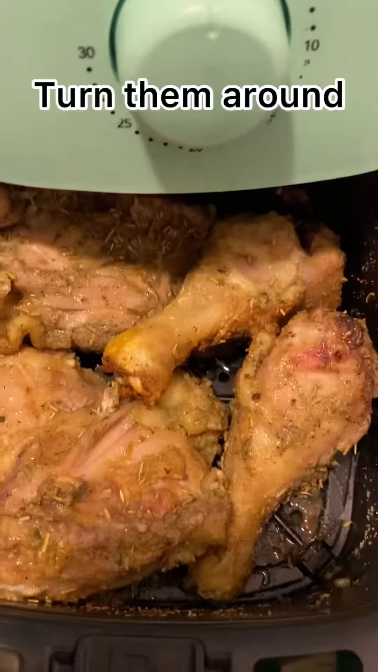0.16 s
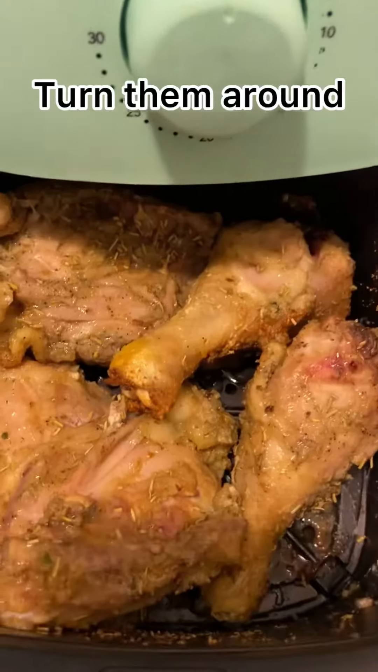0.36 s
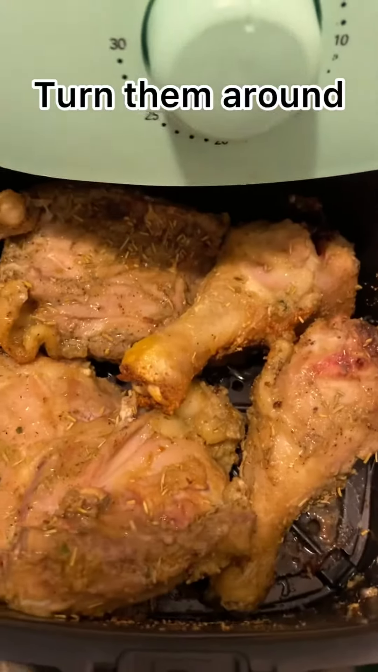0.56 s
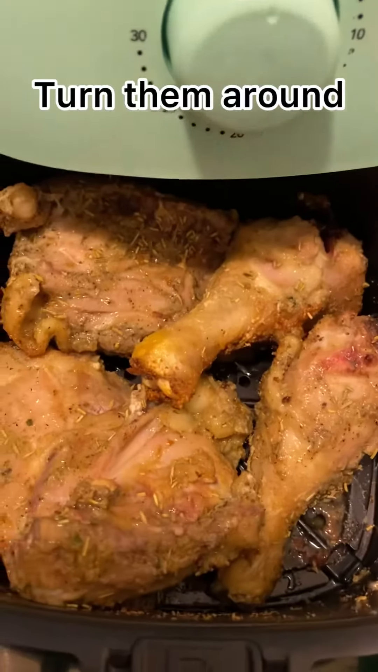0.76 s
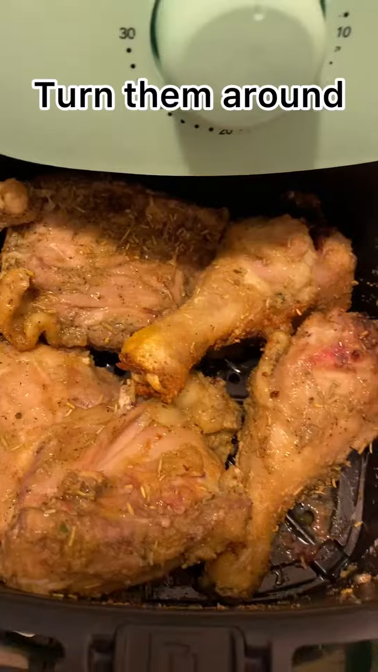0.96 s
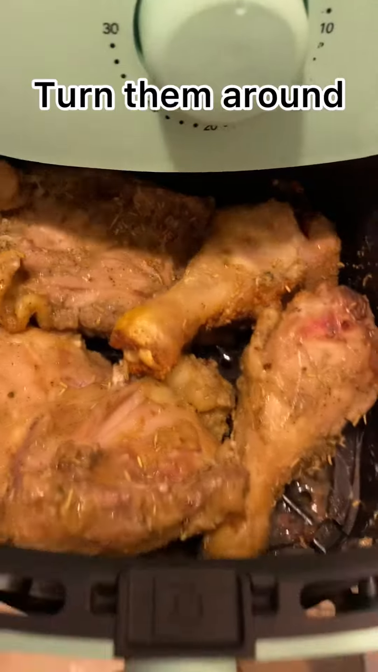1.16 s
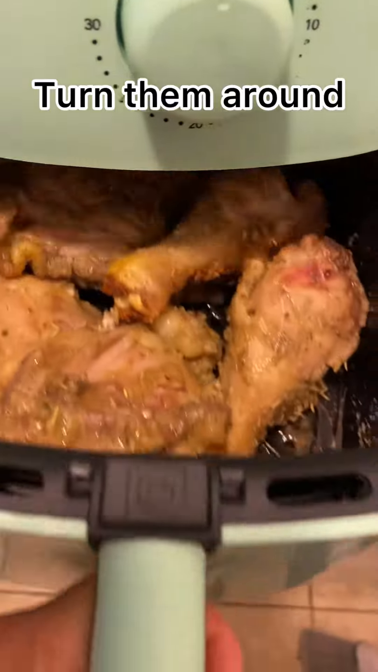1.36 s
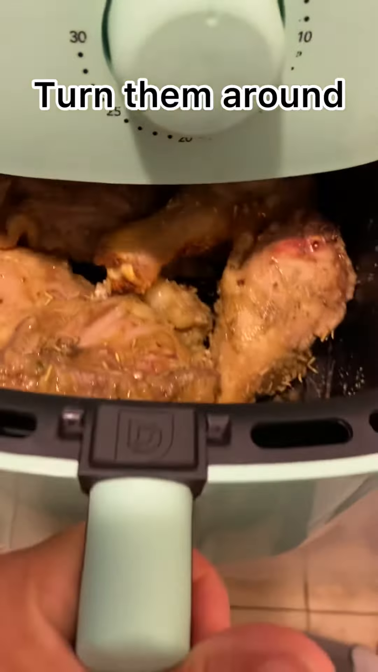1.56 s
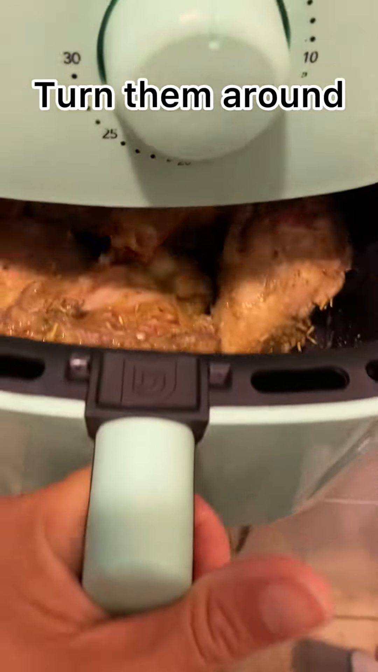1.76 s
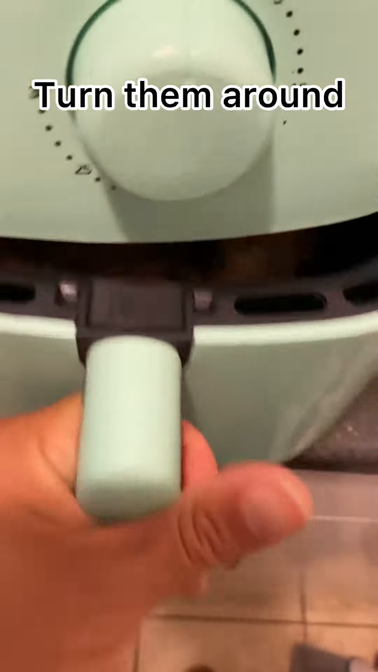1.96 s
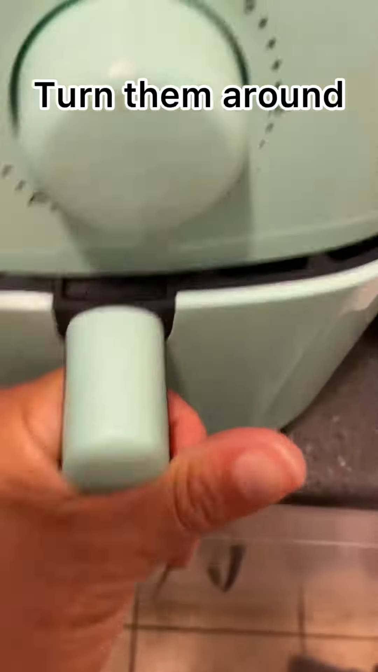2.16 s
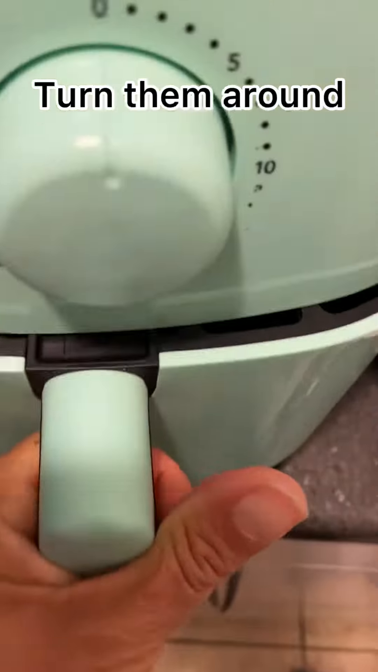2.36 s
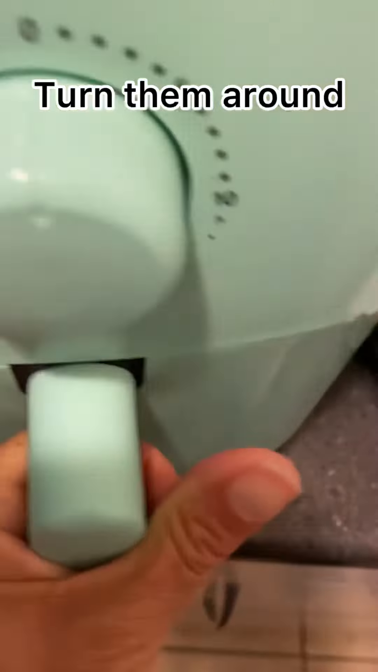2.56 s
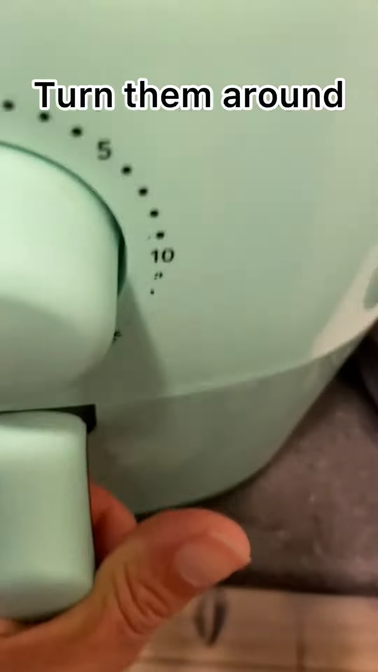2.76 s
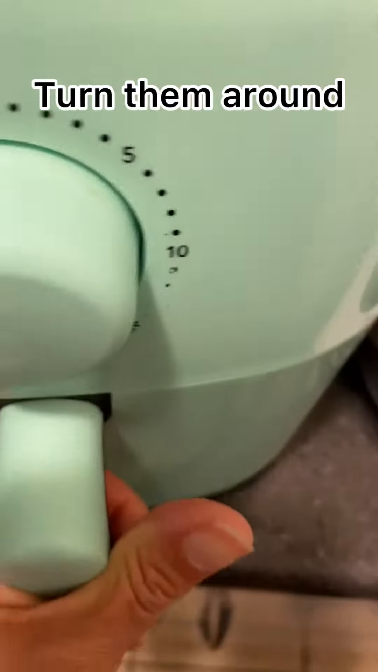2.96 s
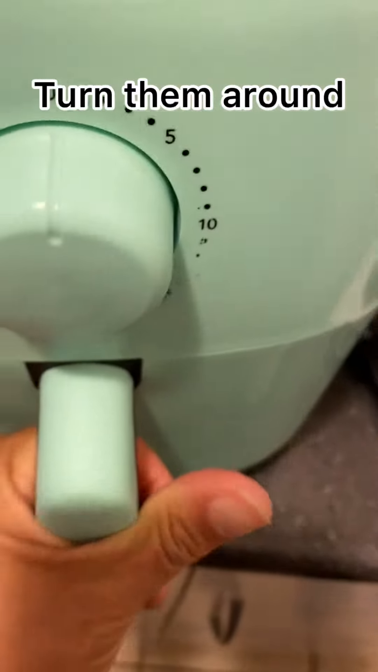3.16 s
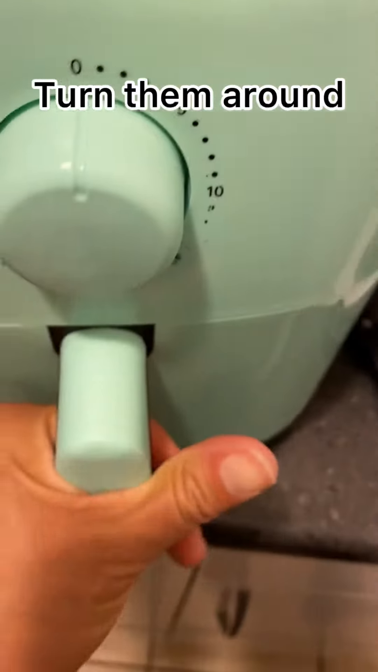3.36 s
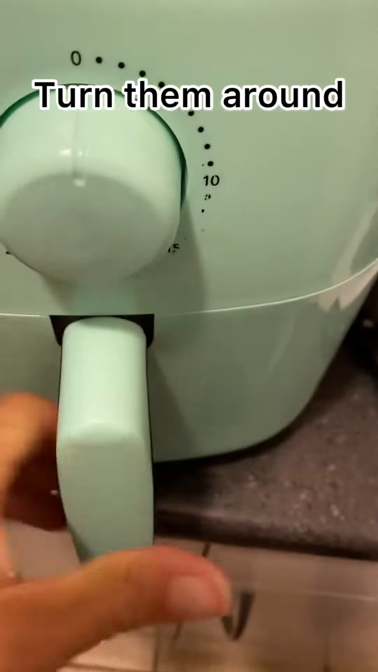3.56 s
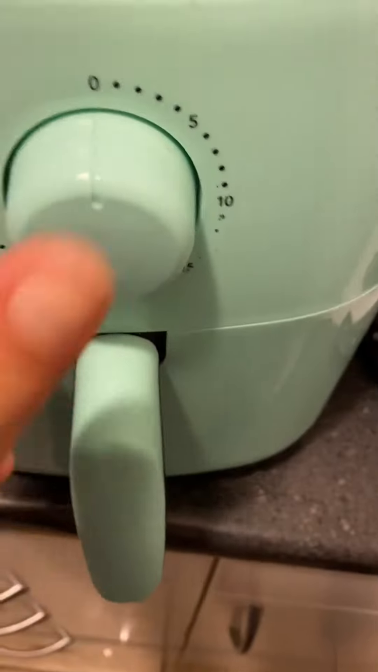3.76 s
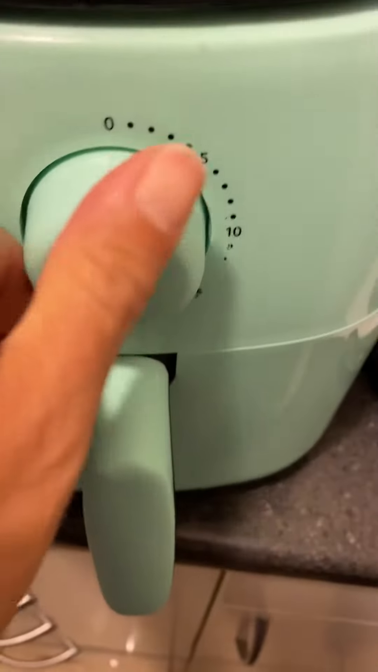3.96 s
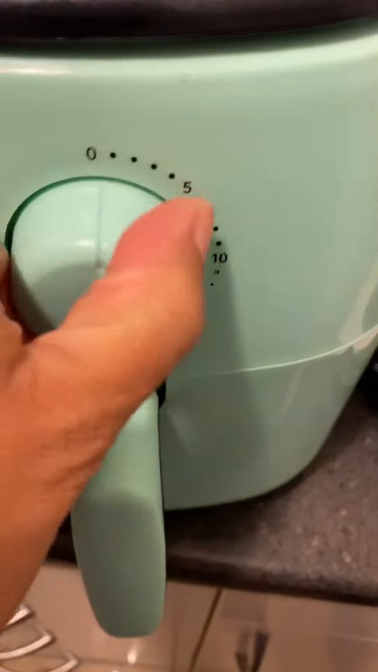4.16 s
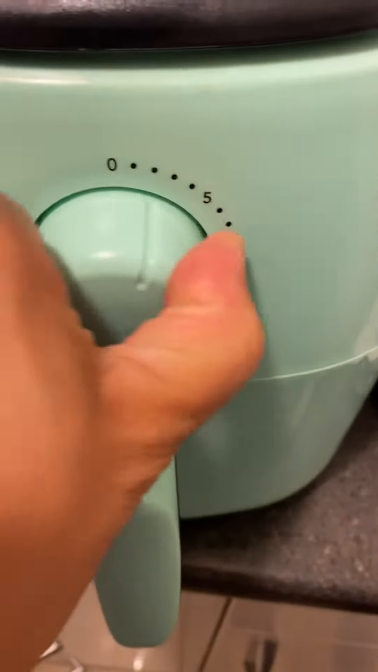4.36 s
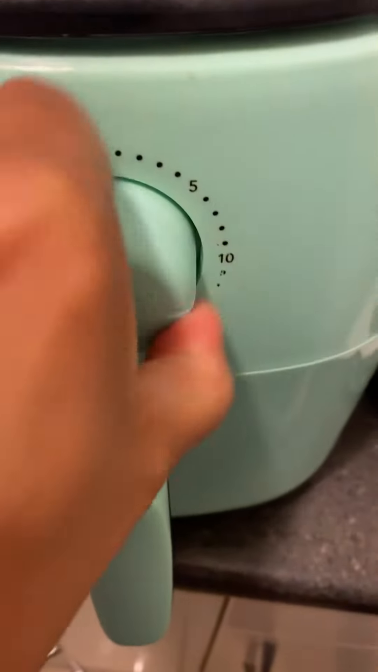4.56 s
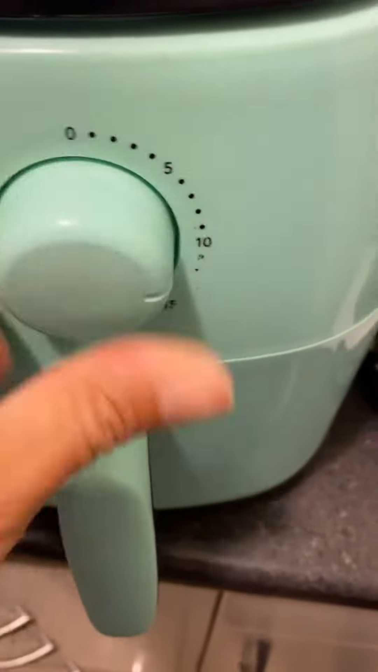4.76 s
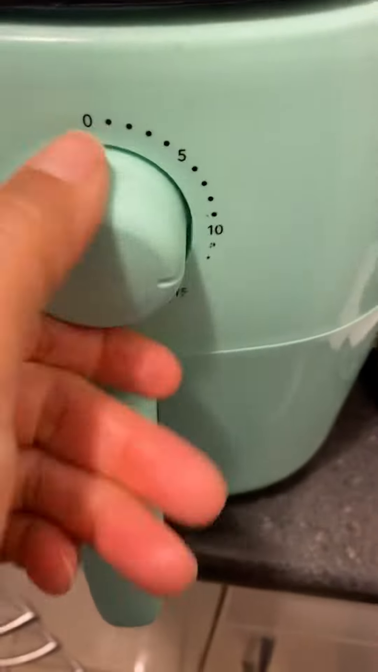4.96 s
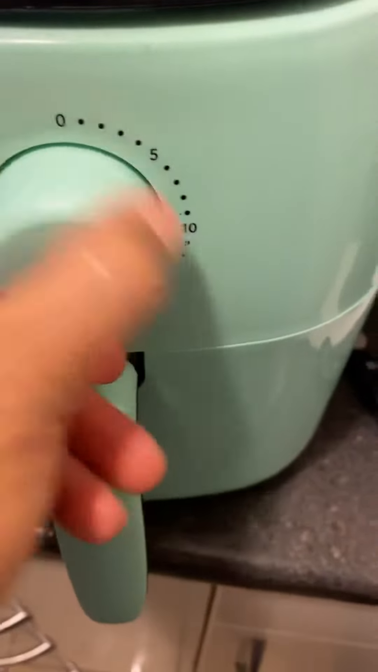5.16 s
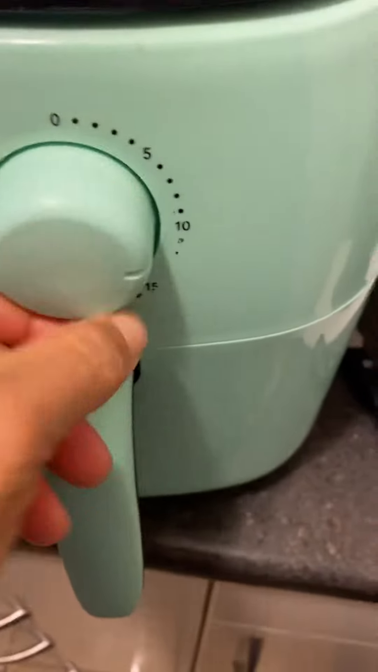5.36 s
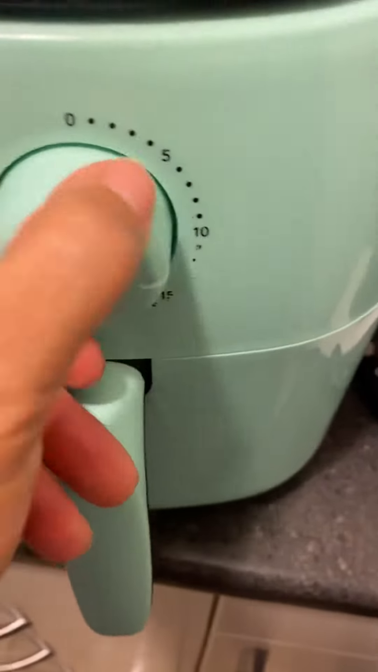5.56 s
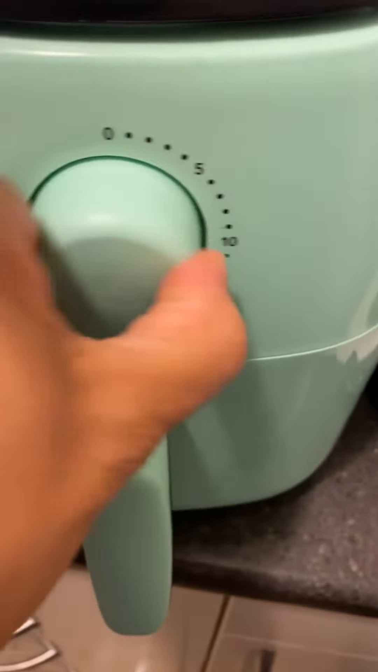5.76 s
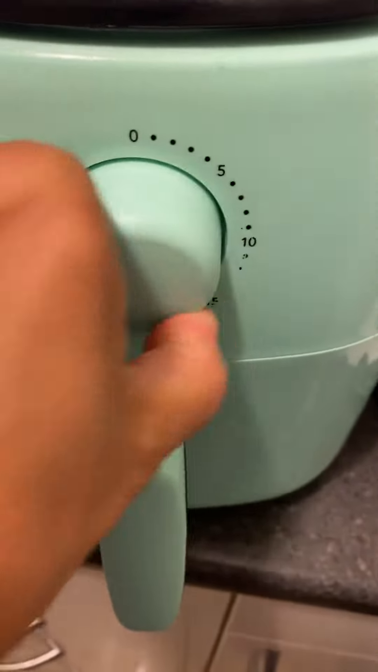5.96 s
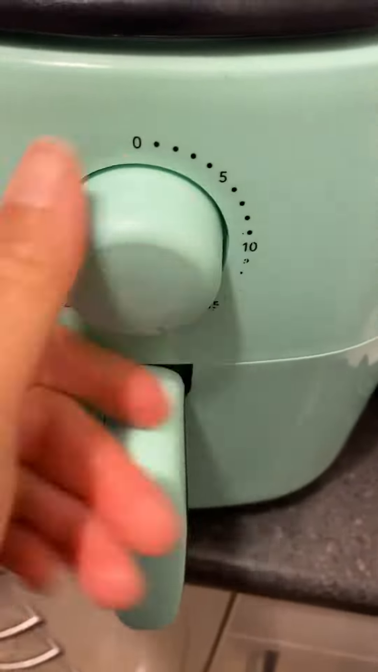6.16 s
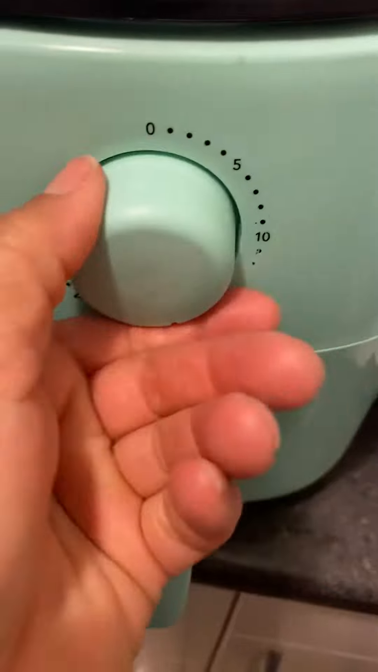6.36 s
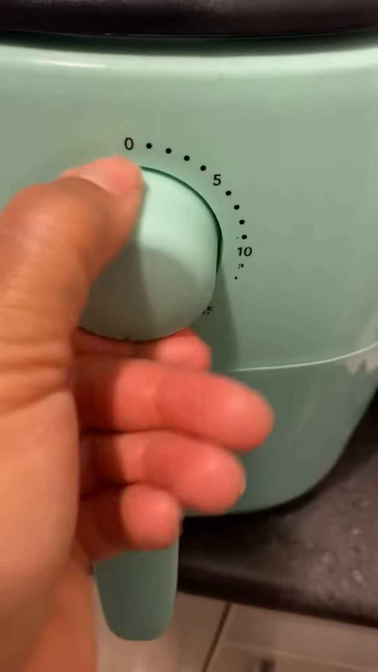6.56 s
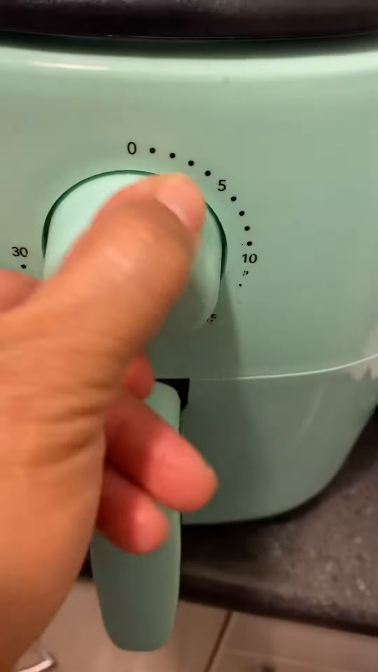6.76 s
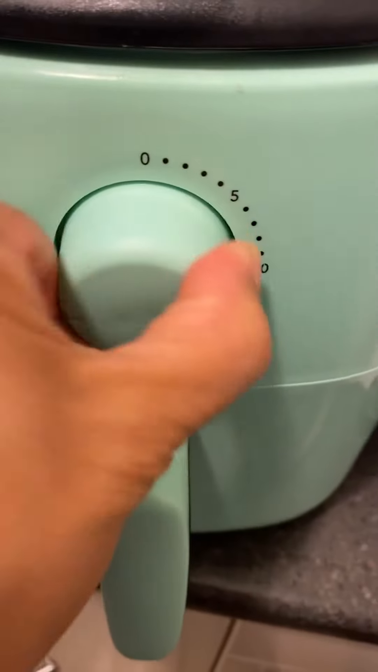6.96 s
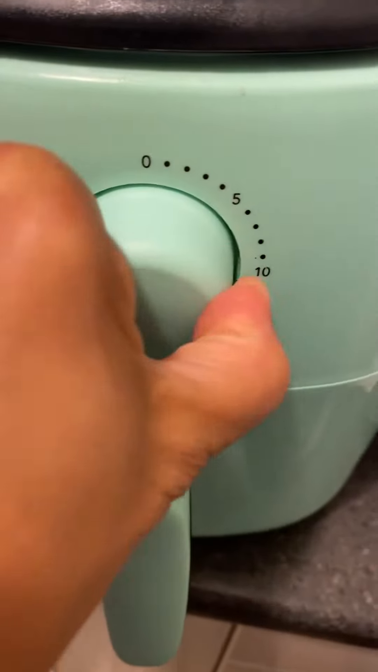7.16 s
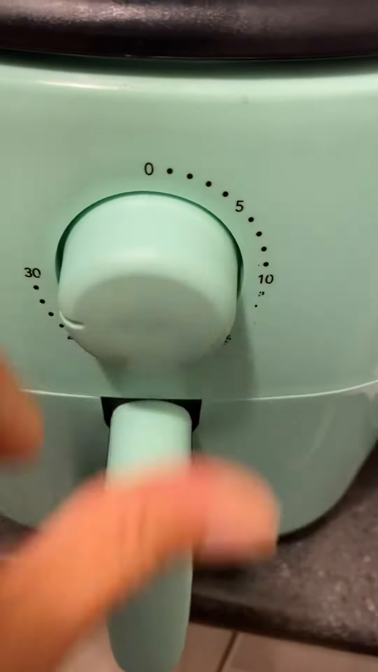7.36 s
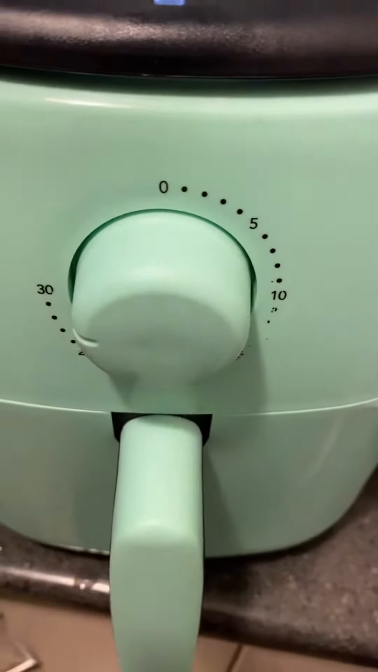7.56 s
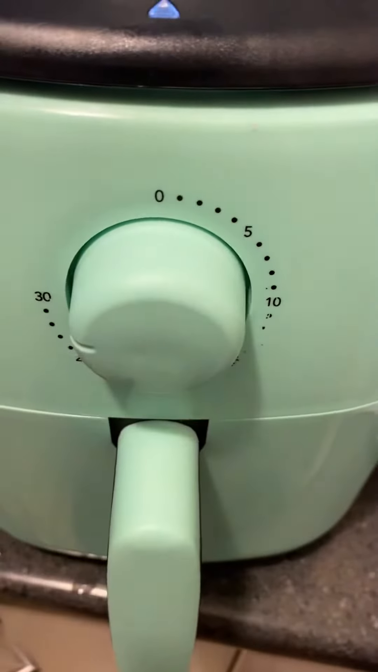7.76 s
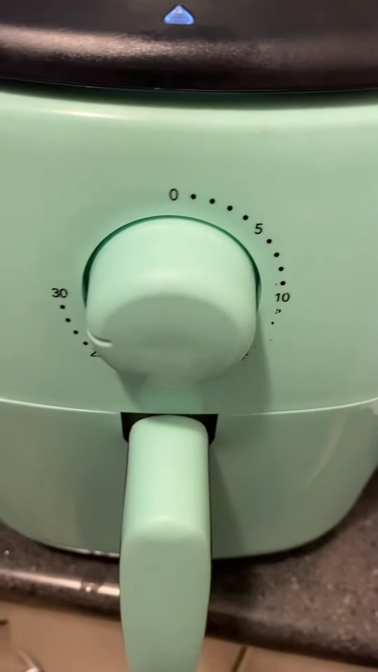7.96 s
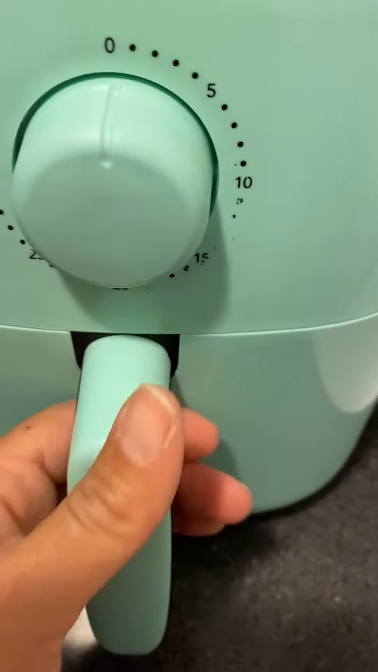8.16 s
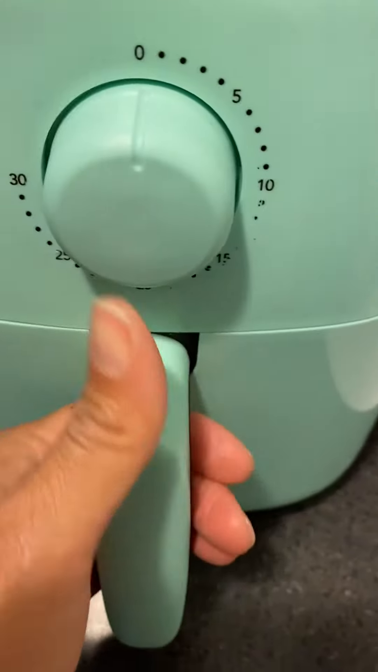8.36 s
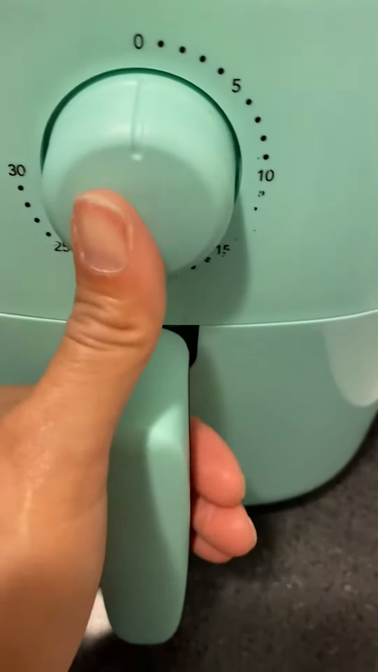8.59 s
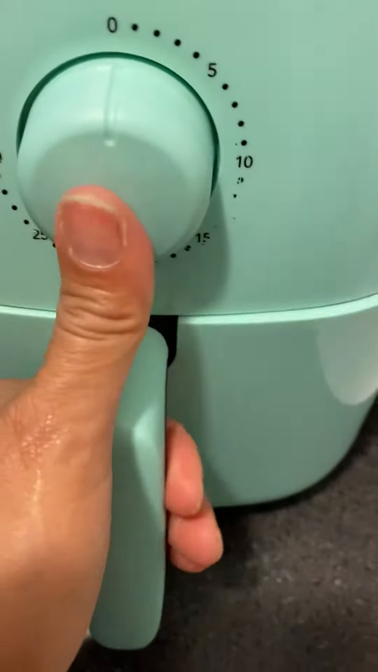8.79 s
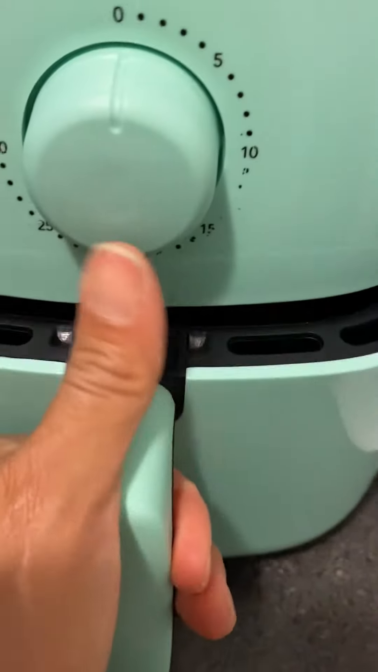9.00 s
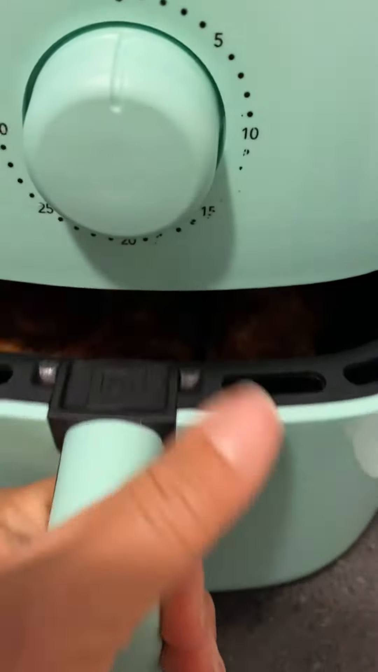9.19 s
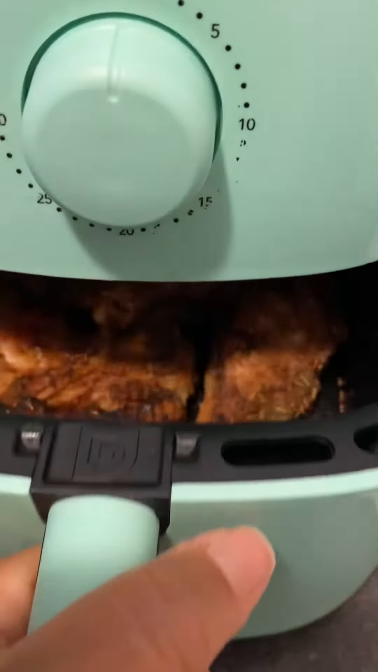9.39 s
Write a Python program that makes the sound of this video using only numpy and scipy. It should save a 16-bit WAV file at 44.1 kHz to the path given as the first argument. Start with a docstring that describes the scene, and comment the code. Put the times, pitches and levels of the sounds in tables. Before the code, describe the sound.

A plastic air fryer basket scrapes softly along its rails and shuts with a loud hollow knock, then a second one. A wind-up timer knob is turned in three strokes of rapid ratcheting clicks. Faint clockwork ticks follow while a fan speeds up, humming and briefly rattling. The fan cuts off abruptly, and the basket knocks loose and slides out. The sounds are close, over a low kitchen rumble.

```python
"""A plastic air fryer on a counter. Its hollow basket rubs along the rails and knocks home.
The timer knob is wound in three strokes, a small catch clicking over its teeth. Clockwork ticks
while the fan speeds up, roaring, humming and rattling a loose grille. The fan sound stops
abruptly and the basket is pulled out again. Low room rumble lies under everything."""
import sys
import numpy as np
from scipy import signal
from scipy.fft import rfft, irfft, next_fast_len
from scipy.io import wavfile

SR = 44100
rng = np.random.default_rng(int(sys.argv[2]) if len(sys.argv) > 2 else 0)


def file_out(sig):
    """Save sig as 16-bit WAV at sys.argv[1]."""
    # one column per channel
    cols = np.atleast_2d(sig).T
    # limit, then scale
    lim = np.clip(cols, -1, 1)
    pcm = np.round(lim * 32767).astype(np.int16)
    wavfile.write(sys.argv[1], SR, pcm)


N = 415930
TIME = np.arange(N) / SR
FFT_SIZE = next_fast_len(N + SR // 2)
HZ = np.maximum(np.fft.rfftfreq(FFT_SIZE, 1 / SR), 1)

# dull noise of the plastic body: f/Hz, level/dB
BODY_SPECTRUM = [(100, -0.5), (200, 1), (350, 5.5), (550, -8), (800, -52)]
# sharp click of a small part: f/Hz, level/dB
CLICK_SPECTRUM = [(500, -7.5), (1000, -6.5), (2200, -4.5), (2580, -9.5), (2850, -6.5), (3500, -8.5),
                  (5000, -12.5), (7000, -9.5), (9500, -11), (12000, -14), (16000, -18)]


def basket_knocks():
    """The hollow basket thuds, hard edges crack, the shell booms on, the counter takes a thump."""
    # knocks: t/s, thud/dB, crack/dB, boost of the deep notes/dB, bright edge over crack/dB
    blows = [(1.3, -39, -61, -9, -6), (1.973, -1.5, -19, -5.5, -12), (1.988, -14.5, -32, -9, -20),
             (2.092, -30, -40, 0, -23), (2.38, -45, -50, -8, -30.5), (2.424, -18, -32, -0.5, -11),
             (2.443, -22.5, -34, 3, -14), (2.468, -29, -25, 6, -9), (2.477, -35, -16.5, 24.5, -14),
             (2.487, -5.5, -60, -0.5, -6), (2.504, -46, -64, -10, -6), (2.687, -37, -52.5, 11.5, -9),
             (2.703, -33, -33, 14, -18.5), (2.749, -38.5, -49, 14.5, -24),
             (2.798, -41.5, -56.5, 15.5, -9.5), (2.91, -42.5, -55.5, -11, -7), (2.993, -33, -61.5, -8.5, 3),
             (3.068, -41.5, -73, 2.5, -6.5), (3.338, -29.5, -33, 16.5, -21.5),
             (4.05, -39.5, -46.5, 5.5, -39.5), (4.59, -34, -43.5, 3, 2.5), (4.77, -34.5, -46.5, 6, 1.5),
             (4.932, -44.5, -85, -7, -11), (5.153, -32, -31.5, 1, -3.5), (5.208, -46, -44.5, -11, -21),
             (6.082, -36.5, -57, -3, 2), (8.275, -48, -72.5, -7, 6), (8.504, -38.5, -45, -3, -20),
             (8.526, -42, -42.5, -3, -24), (8.664, -45, -69, -20, 0), (8.733, -47, -26.5, -11, -7.5),
             (8.756, -16, -23, -21, -14.5), (8.768, -9.5, -21, -29, -30), (8.794, -26, -65, -10, -1),
             (8.849, -30.5, -33, 7.5, -30)]
    # notes the basket rings with: f/Hz, level/dB, ring time/s
    basket_modes = [(308, 3, .055), (231, -8, .1), (325, -17, .2), (375, -8, .06), (490, -7, .03),
                    (560, -12, .06), (624, -15, .04), (800, -19, .04), (926, -22, .04), (130, -16, .12),
                    (1500, -24, .05), (1900, -24, .04), (2380, -26, .04)]
    # the crack, its bright edge and the counter's thump: f/Hz, level/dB
    crack_spectrum = [(300, 4), (700, 7), (1500, -4.5), (3000, -11), (4500, -24), (8000, -47.5)]
    edge_spectrum = [(2500, -25), (4000, -1), (5200, -5.5), (6500, -0.5), (9000, -6.5), (12000, -10.5),
                     (16000, -8)]
    thump_spectrum = [(20, -20), (45, 22), (70, 11), (120, 15.5), (200, -44)]
    # hard plastic edges snapping together: t/s, level/dB, f/Hz
    clacks = [(1.986, -26.5, 5000), (2.479, -20.5, 5060), (2.7033, -25, 2940), (3.341, -40, 2830),
              (6.23, -38, 1730), (8.506, -40.5, 1201), (8.529, -32.5, 1500), (8.734, -29.5, 2150),
              (8.765, -20, 510)]
    times, thud_db, crack_db, deep_db, edge_db = np.transpose(blows)
    thud = strike(times - .002, thud_db, basket_modes, spread_db=1, soft_s=.014, deep_db=deep_db)
    crack = burst(times, crack_db, crack_spectrum, t60=.055, tail_db=-11, tail_t60=.18, rise_s=.004)
    crack += burst(times, crack_db + edge_db, edge_spectrum,
                   t60=.037, tail_db=-13, tail_t60=.14, rise_s=.004)
    t = np.arange(SR // 20) / SR
    for at, db, hz in clacks:
        crack[int(at * SR):][:len(t)] += amp(db - 60 * t / .012) * np.sin(2 * np.pi * hz * t)
    # boom and thump grow more slowly than the thud as the knocks get harder
    boom_db, thump_db = -32 + .54 * thud_db, -41 + .19 * thud_db
    boom = noise(BODY_SPECTRUM) * fade(clicks(times, amp(boom_db)), t60=.41)
    thump = burst(times, thump_db, thump_spectrum, t60=.45, tail_db=-30.5, tail_t60=.78, rise_s=.039)
    return thud + crack + boom + thump


def rubbing():
    """The sliding basket and shifting hands make grainy noise; sliding sets the hollows singing."""
    # four slides on the rails, each a list of: t/s, level/dB, treble over level/dB, bass over level/dB
    slides = [
        [(0.0, -112, -22, 6), (0.09, -64.5, -14, 6), (0.16, -59, -9.5, -2), (0.27, -67, -11, 7),
         (0.34, -112, -16.5, 8.5)],
        [(1.03, -87, 14, 19), (1.075, -51, -13, -4), (1.237, -48, -6.5, -17), (1.3, -54, -8.5, 2.5),
         (1.527, -53, -9, -3), (1.713, -50, -7.5, -5), (1.857, -46, -7.5, 1), (1.96, -44.5, -3.5, 1.5),
         (2.05, -58.5, -31.5, 8.5), (2.16, -67, -32, 5.5), (2.3, -82.5, -20.5, 6.5)],
        [(2.33, -89.5, -17, 7), (2.42, -54.5, -15, 2), (2.47, -59.5, -13, 1.5), (2.52, -84.5, -9.5, 0)],
        [(8.64, -91, -14, 1.5), (8.71, -58, -16.5, 2.5), (8.776, -49, -9, 2), (8.882, -63.5, -5.5, 4),
         (8.958, -67.5, -3, 0), (9.078, -53.5, -7.5, 7), (9.218, -57, -8, 0), (9.43, -58, -5.5, -3)],
    ]
    # hands shifting on the shell: t/s, level/dB
    hand_moves = [(0, -85.5), (0.81, -87), (1.02, -76), (2.2, -77), (2.6, -74.5), (2.72, -84), (2.92, -78),
                  (3.2, -71), (3.39, -72.5), (3.62, -78.5), (4.1, -81), (4.56, -56.5), (4.8, -93),
                  (5.16, -55), (5.4, -93), (5.52, -73), (5.9, -58), (6.03, -77), (6.17, -70), (6.3, -79),
                  (7.1, -74.5), (7.55, -73), (8.07, -75.5), (8.45, -72.5), (8.59, -63.5), (8.66, -72)]
    # hollows of the drawer: f/Hz, width/Hz, level/dB
    hollows = [(480, 70, -3), (636, 60, -2), (876, 110, -7), (1336, 60, -3), (1600, 120, -6),
               (1823, 130, -6), (2350, 150, -8), (2720, 150, -6), (3030, 100, -11), (3830, 160, -16),
               (4180, 120, -17), (5060, 220, -18)]
    # middle and treble of the rubbing: f/Hz, level/dB
    mid_spectrum = [(300, -29.5), (550, -10), (700, -4), (1200, -7), (2400, -10), (3400, -22.5),
                    (5000, -50.5)]
    treble_spectrum = [(1500, -25), (3000, 1.5), (4000, 0), (5000, 0), (7000, 1.5), (9000, -4), (12000, -6),
                       (16000, -9.5)]
    slide = sum(amp(curve(rows, 1, -120)) for rows in slides)
    slide_treble = sum(amp(curve(rows, 1, -120) + curve(rows, 2)) for rows in slides)
    slide_bass = sum(amp(curve(rows, 1, -120) + curve(rows, 3)) for rows in slides)
    hands = amp(curve(hand_moves, 1))
    # the upper hollows swell as the gap closes
    closing_s, shut_s, upper_hz = 1.55, 1.7, 1450
    closing_db = 5 * np.clip((TIME - closing_s) / (shut_s - closing_s), 0, 1) * (TIME < shut_s)
    singing = sum(amp(db + 3 * drift(18) + closing_db * (hz > upper_hz)) * noise_band(hz, width)
                  for hz, width, db in hollows)
    bass = amp(2.7 * drift(10)) * (slide_bass + amp(7) * hands) * noise(BODY_SPECTRUM)
    grain = amp(drift(35))
    mid = amp(-.5) * (slide + hands) * noise(mid_spectrum)
    treble = amp(3.5) * (slide_treble + amp(-7) * hands) * noise(treble_spectrum)
    return bass + amp(-5.5) * slide * singing + grain * (mid + treble)


def timer_ratchet():
    """A catch drops off tooth after tooth at uneven gaps, bounces once and rings the knob."""
    # winding strokes: start/s, end/s, starting rate/(teeth per s), final rate/(teeth per s), level/dB
    strokes = [(4.299, 4.545, 134, 130, -26.5), (5.56, 5.861, 148, 110, -28), (6.392, 6.941, 132, 158, -29)]
    # slow first teeth, teeth that stand out, and clacks of the loose knob: t/s, level/dB
    snaps = [(4.15, -45.5), (4.169, -26), (4.1795, -27.5), (4.1878, -24), (4.199, -25.5), (4.2113, -25.5),
             (4.225, -22.5), (4.2348, -25.5), (4.2424, -25), (4.252, -25.5), (4.267, -24), (4.281, -25.5),
             (4.295, -26), (4.3418, -23), (4.351, -22), (4.365, -22), (4.3724, -22), (4.3916, -24),
             (4.482, -24.5), (4.506, -22), (4.517, -27), (4.58, -21.5), (5.0092, -31.5), (5.051, -47),
             (5.0973, -27.5), (5.1474, -18.5), (5.425, -48), (5.434, -33.5), (5.5423, -45), (5.664, -21.5),
             (5.9122, -25), (6.23, -42), (6.363, -46.5), (6.4014, -32), (6.51, -25), (6.7195, -22.5),
             (6.809, -21), (6.889, -19.5), (6.914, -20), (6.934, -27), (6.9572, -27.5), (7.0298, -27),
             (7.1785, -23)]
    # notes of the knob, and the two pairs of notes in its bright ring: f/Hz, level/dB, ring time/s
    knob_modes = [(964, -5, 0.086), (1073, -6, 0.055), (1274, -8.5, 0.089), (1540, -5, 0.18),
                  (1757, -1, 0.079), (1890, -5, 0.06), (2243, 5.5, 0.021), (2795, -4, 0.036),
                  (3210, -9, 0.025), (3860, 0, 0.02), (4154, -0.5, 0.03), (7330, 9.5, 0.014),
                  (8250, -1.5, 0.026), (8650, 5.5, 0.0092), (10050, -2, 0.017), (11970, -2.5, 0.012),
                  (13200, -12, .012)]
    bright_modes = [(4614, -16, 0.041), (4734, -2, 0.026), (5047, -5, 0.052), (5204, 0, 0.027)]
    # the ring moves between the pairs as the grip shifts: t/s, boost of the lower pair/dB
    grip = [(4.17, 10), (4.3, -7), (4.43, -10), (4.55, -4), (5.56, 4), (5.68, -4), (5.86, -4), (6.4, 6),
            (6.5, 3), (6.7, -2), (6.95, 12.5)]
    # pitches at which the plates colour each click: f/Hz, width/Hz, level/dB
    plates = [(1150, 220, -7), (2070, 350, -10), (2830, 130, 0.5), (4900, 700, 3.5)]
    rate, stroke_db = np.zeros(N), np.zeros(N)
    for start, end, first_rate, last_rate, db in strokes:
        progress = (TIME - start) / (end - start)
        winding = (progress > 0) & (progress < 1)
        rate += winding * (first_rate + (last_rate - first_rate) * progress)
        stroke_db += winding * (db + .5 * (np.sin(np.pi * progress) - .5))   # louder in mid stroke
    teeth_passed = np.cumsum(rate * amp(1.8 * drift(39))) / SR
    teeth = np.flatnonzero(np.diff(np.floor(teeth_passed)))
    snap_times, snap_db = np.transpose(snaps)
    gap_to_snap = np.abs(teeth[:, None] / SR - snap_times).min(axis=1)
    teeth = teeth[gap_to_snap > .005]   # a snap takes a tooth's place
    tooth_db = stroke_db[teeth + 1] + 1.5 * rng.standard_normal(N)[teeth]
    times, db = np.r_[snap_times, teeth / SR], np.r_[snap_db, tooth_db]
    tip = burst(times, db - 3, CLICK_SPECTRUM, t60=.003, tail_db=-60, tail_t60=.01, rise_s=.0003)
    times, db = hit_twice(times, db, gap_s=.0015, drop_db=10)
    grip_db = np.interp(times, *np.transpose(grip))
    ring = strike(times, db - 16.5, bright_modes, spread_db=3.04, deep_db=grip_db, deep_hz=4950)
    knob = strike(times, db - 19, knob_modes, spread_db=4)
    rasp = burst(times, db - 15, CLICK_SPECTRUM,
                 t60=.021, tail_db=-9, tail_t60=.099, rise_s=.00078, peaks=plates)
    return tip + ring + knob + rasp


def clockwork():
    """At each tick a little lever meets a toothed wheel twice, ringing the clockwork's plates."""
    # ticks: t/s, level/dB, 1 if a faint release click comes first
    ticks = [(4.7548, -49, 1), (4.9838, -46.5, 0), (5.203, -53, 0), (6.1023, -45, 1), (7.238, -42, 0),
             (7.4585, -47.5, 1), (7.6876, -41.5, 0), (7.9036, -47.5, 1)]
    # notes of the plates: f/Hz, level/dB, ring time/s
    plate_modes = [(2040, -4, 0.027), (2730, -12, 0.039), (3820, -16.5, 0.02), (4760, 4, 0.026),
                   (4930, -5, 0.07), (5120, -1.5, 0.02), (9350, 1, 0.0059), (11100, -10, 0.0055)]
    times, db, release = np.transpose(ticks)
    times, db = np.r_[times, times[release > 0] - .022], np.r_[db, db[release > 0] - 11]
    times, db = hit_twice(times, db, gap_s=.003, drop_db=11.5)
    ring = strike(times, db, plate_modes, spread_db=2.5)
    return ring + burst(times, db + 2.5, CLICK_SPECTRUM, t60=.025, tail_db=-26, tail_t60=.15)


def fan():
    """The blades hum at a rising pitch and the air roars louder with speed; the grille joins late."""
    # rushing air: f/Hz, level/dB
    air_spectrum = [(59, -53), (100, -8.5), (177, -7.5), (220, 1.5), (277, -4.5), (333, 1), (475, -12.5),
                    (721, -18), (1160, -29), (1300, -30.5), (4000, -50), (5200, -52), (8800, -120)]
    on_s, off_s, run_up_s = 4.4, 8.062, 2.0
    start_hz, top_hz, housing_hz = 248, 740, 555
    blade_hz = top_hz - (top_hz - start_hz) * np.exp(-np.maximum(TIME - on_s, 0) / run_up_s)
    phase = 2 * np.pi * np.cumsum(blade_hz * (1 + .016 * drift(36))) / SR
    hum_db = -56.5 - ((blade_hz - housing_hz) / 33.7) ** 2   # loudest at the housing's own pitch
    hum = np.sqrt(2) * amp(hum_db + 4 * drift(20)) * np.sin(phase)
    roar = amp(-38.5 + drift(20)) * (blade_hz / top_hz) ** 2.62 * noise(air_spectrum)
    return (hum + roar + grille_rattle(off_s)) * ((TIME > on_s) & (TIME < off_s))


def grille_rattle(until_s):
    """The fan shakes a loose grille into a steady run of double taps."""
    # strength of the rattle: t/s, level/dB
    strength = [(7.21, -84), (7.28, -36.5), (7.53, -35.5), (7.65, -59.5), (7.75, -46.5), (7.81, -36),
                (7.87, -55), (8.06, -59)]
    # notes of the grille: f/Hz, level/dB, ring time/s
    grille_modes = [(688, 0, 0.04), (912, -6.5, 0.024), (293, 0, 0.062)]
    turns_per_s = 29.5
    times = np.arange(strength[0][0], until_s, 1 / turns_per_s)
    db = np.interp(times, *np.transpose(strength))
    times, db = hit_twice(times, db, gap_s=.012, drop_db=13)
    return strike(times, db, grille_modes, spread_db=2.9, soft_s=.0073)


def crackles():
    """Tiny dry crackles: some single ones and one faint, quick run."""
    # single crackles: t/s, level/dB
    singles = [(0.6987, -60), (0.848, -54), (0.9885, -48), (1.017, -49), (1.019, -52), (2.945, -61),
               (3.149, -62), (3.75, -71), (4.094, -66)]
    # their thin, bright sound: f/Hz, level/dB
    spectrum = [(2000, -16), (4000, -16), (7000, -7), (10000, -4), (16000, -9.5)]
    run = np.c_[rng.uniform(.72, .84, size=7), -64 + 3 * rng.standard_normal(size=7)]
    times, db = np.transpose(np.r_[singles, run])
    return burst(times, db, spectrum, t60=.012, tail_db=-16.5, tail_t60=.12, rise_s=.0023)


def faint_hisses():
    """Short bands of hiss swell and die away."""
    # hisses: start/s, end/s, f/Hz, width/Hz, level/dB
    hisses = [(0.062, 0.3, 590, 220, -55.5), (1.8, 2.6, 2300, 350, -74.5), (3.605, 3.955, 3080, 395, -80),
              (5.2, 5.358, 2100, 300, -66), (7.44, 7.71, 2680, 430, -69), (8.1, 8.66, 2770, 320, -68.5),
              (3.43, 3.6, 10500, 11000, -63.5), (3.87, 3.96, 10000, 3000, -82),
              (3.46, 3.53, 2700, 1000, -63.5), (3.43, 3.6, 3400, 5100, -66), (3.3, 3.4, 9500, 5000, -69),
              (2.52, 2.67, 4700, 120, -78), (3.6, 4.0, 1490, 300, -78.5), (2.4, 3.36, 2500, 780, -75),
              (3.1, 3.3, 9400, 4600, -78), (4.76, 4.83, 4500, 1800, -65), (4.8, 4.98, 1960, 430, -79),
              (3.88, 3.96, 5200, 1200, -81), (4.607, 4.677, 12200, 3300, -57),
              (5.047, 5.171, 10500, 3860, -62), (5.298, 5.351, 11500, 9700, -59.5)]
    out = np.zeros(N)
    for start, end, hz, width, db in hisses:
        span = slice(int(start * SR), int(end * SR))
        swell = np.sin(np.pi * (TIME[span] - start) / (end - start))
        out[span] += amp(db) * swell * noise_band(hz, width, size=len(swell))
    return out


def room():
    """A low, gently wavering rumble with a very quiet hiss."""
    # the room's rumble and hiss: f/Hz, level/dB
    rumble_spectrum = [(12, -71.5), (20, -49.5), (47, -11.5), (69, -1.5), (135, -17), (156, -18.5),
                       (232, -20.5), (286, -32.5), (558, -33.5), (900, -64.5), (1170, -92.5), (1980, -120)]
    hiss_spectrum = [(600, 5.5), (2000, -7), (6000, -11.5), (10000, -9.5), (16000, -16)]
    return amp(-49.5 + .4 * drift(3)) * noise(rumble_spectrum) + amp(-90) * noise(hiss_spectrum)


def amp(db):
    """Turn decibels into a gain."""
    return 10 ** (np.asarray(db) / 20)


def curve(rows, column, outside=None):
    """One column of a time table, filled in for every sample."""
    rows = np.array(rows)
    return np.interp(TIME, rows[:, 0], rows[:, column], outside, outside)


def along_hz(rows, column=1):
    """One column of a frequency table, filled in for every frequency in HZ."""
    rows = np.array(rows)
    return np.interp(np.log(HZ), np.log(rows[:, 0]), rows[:, column])


def noise(spectrum, peaks=()):
    """Noise of strength 1, shaped by a spectrum and any extra peaks."""
    humps = 1 + amp(5.2) * sum(amp(db) / (1 + (2 * (HZ - hz) / width) ** 2) for hz, width, db in peaks)
    white = rfft(rng.standard_normal(N), FFT_SIZE)
    x = irfft(white * amp(along_hz(spectrum)) * humps, FFT_SIZE)[:N]
    return x / x.std()


def noise_band(hz, width, size=N):
    """Noise of strength 1, filtered twice to gather it around one pitch."""
    r = np.exp(-np.pi * width / SR)
    resonance = [1, 0, -1, 1, -2 * r * np.cos(2 * np.pi * hz / SR), r * r]
    x = signal.sosfilt([resonance] * 2, rng.standard_normal(size))
    return x / x.std()


def drift(rate):
    """A random wobble of typical size 1 that takes a new course `rate` times a second."""
    points = rng.standard_normal(int(N / SR * 40) + 2)
    wobble = np.interp(TIME * rate, np.arange(len(points)), points)
    return wobble / wobble.std()


def clicks(times, gains):
    """One-sample spikes at the given times."""
    train = np.zeros(N)
    np.add.at(train, np.clip(np.round(times * SR).astype(int), 0, N - 1), gains)
    return train


def hit_twice(times, db, gap_s, drop_db):
    """Follow every hit with a weaker one."""
    return np.r_[times, times + gap_s], np.r_[db, db - drop_db]


def fade(x, t60):
    """Give each spike a tail that falls by 60 dB in t60 seconds."""
    return signal.lfilter([1], [1, -amp(-60 / (t60 * SR))], x + 1e-18)


def strike(times, levels_db, modes, spread_db, soft_s=0., deep_db=0, deep_hz=270):
    """Each hit rings all of an object's own notes (modes), each with a partly random strength."""
    out = np.zeros(N)
    chance = rng.standard_normal((len(times), len(modes)))
    for k, (hz, db, t60) in enumerate(modes):
        decay, step = amp(-60 / (t60 * SR)), 2 * np.pi * hz / SR
        strength_db = levels_db + db + spread_db * chance[:, k] + deep_db * (hz < deep_hz)
        train = clicks(times, (-1) ** k * amp(strength_db))
        if soft_s:   # a soft contact lets the note swell for soft_s seconds
            n = np.arange(int(soft_s * SR))
            swell = np.hanning(len(n))
            train = signal.oaconvolve(train, 2 * swell * np.cos(step * n) / swell.sum())[:N]
        out += signal.lfilter([0, np.sin(step)], [1, -2 * decay * np.cos(step), decay ** 2],
                              train + 1e-18)
    return out


def burst(times, levels_db, spectrum, t60, tail_db, tail_t60, rise_s=.0015, peaks=()):
    """A crack of noise and the quieter tail that the room sends back."""
    train = clicks(times, amp(levels_db))
    shape = fade(train, t60) + amp(tail_db) * fade(train, tail_t60) - fade(train, rise_s)
    return noise(spectrum, peaks) * shape


def scene():
    """Mix and widen: left and right differ in phase, level and diffuseness from band to band."""
    # left against right: f/Hz, phase lead/half turns, level/dB, diffuse share (0-1)
    stereo = [(60, 0, 0, .03), (450, 0, 0, .06), (600, 0, 2, .5), (800, -.1, 5, .7), (1300, -.38, 3, .6),
              (1900, 0, -4, .5), (2300, .1, -1, .45), (2700, .45, 0, .6), (3300, .06, 2, .55),
              (4000, .2, -2, .3), (4500, .12, -4, .25), (5200, .03, 1, .2), (6000, .33, 1, .4),
              (6700, 1, 0, .03), (7900, 1, 0, .04), (9000, 1.55, 0, .45), (10000, 1.97, 0, .05),
              (11300, 2.04, 0, .1), (11900, 2.5, 0, .5), (12600, 3, 0, .04), (14300, 3, 0, .04),
              (15300, 3.8, 0, .6)]
    mono = (room() + rubbing() + faint_hisses() + basket_knocks()
            + timer_ratchet() + clockwork() + crackles() + fan())
    # a short, fading noise smears part of the sound so that it seems spread out (diffuse)
    smear = rng.standard_normal(SR // 6) * amp(-60 * np.arange(SR // 6) / (.14 * SR))
    diffuse = along_hz(stereo, 3) * rfft(smear / np.linalg.norm(smear), FFT_SIZE)
    lean = np.exp(.5j * np.pi * along_hz(stereo)) * amp(along_hz(stereo, 2) / 2)   # half for each side
    left, right = (1 + diffuse) * lean, (1 - diffuse) / lean
    return irfft(rfft(mono, FFT_SIZE) * np.array([left, right]), FFT_SIZE)[:, :N]


def record(dry):
    """Round off the loudest peaks and remove the highest treble."""
    rounded = 1.3 * np.tanh(dry / 1.3)
    return signal.sosfilt(signal.cheby2(12, 70, 16800, fs=SR, output="sos"), rounded)


dry = scene()
out = record(dry)
file_out(out)
```